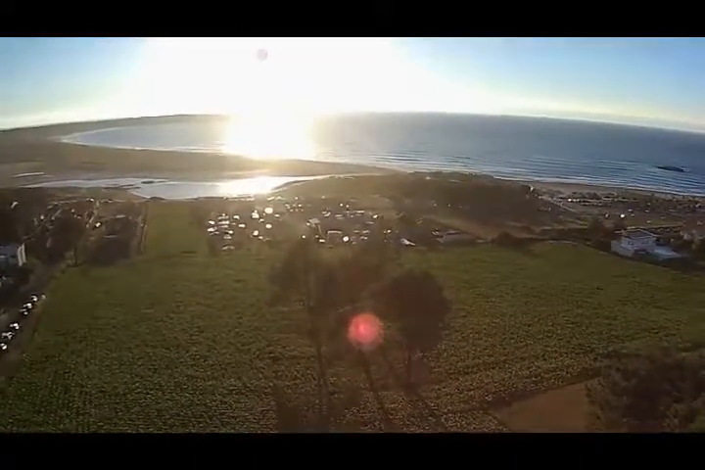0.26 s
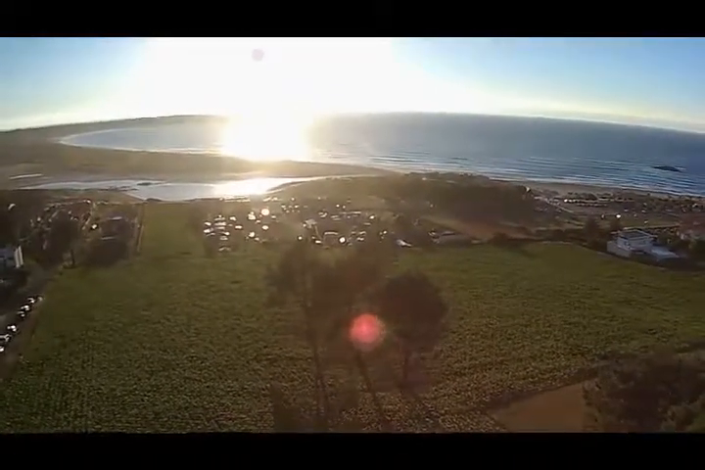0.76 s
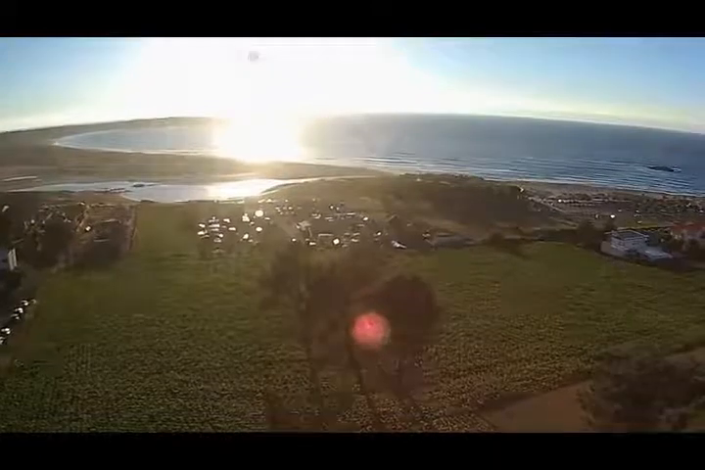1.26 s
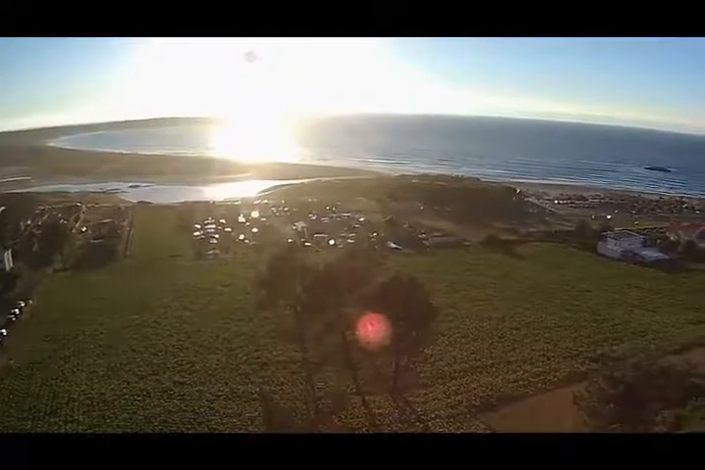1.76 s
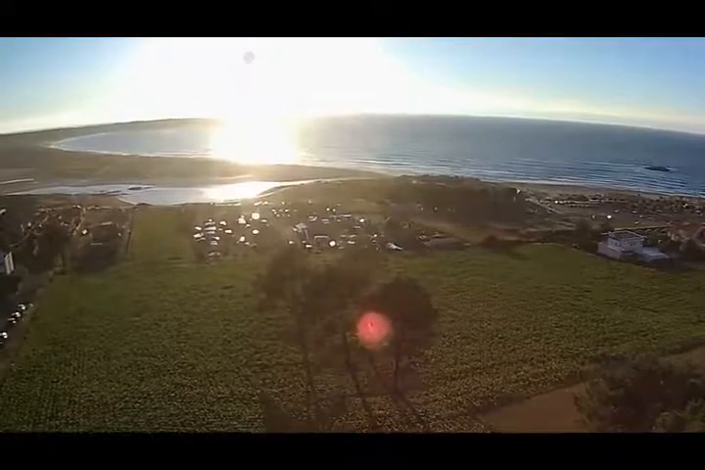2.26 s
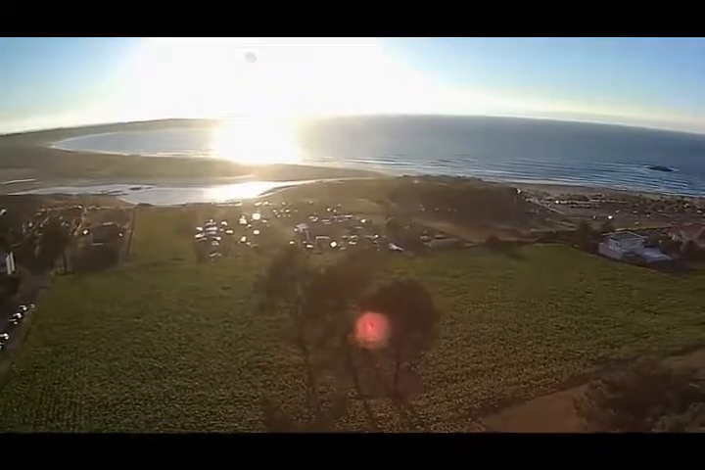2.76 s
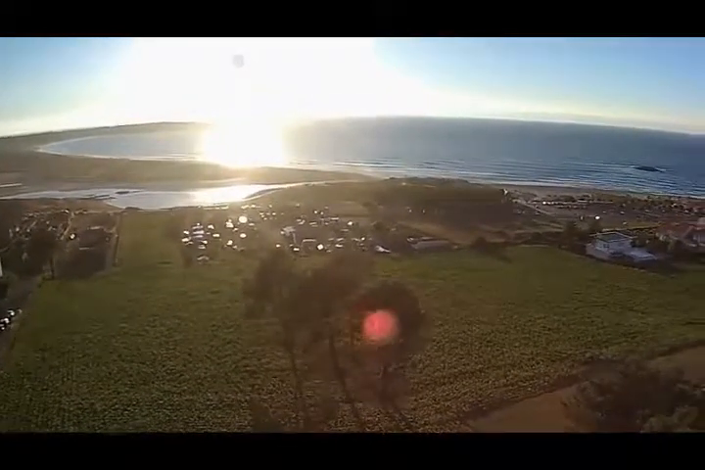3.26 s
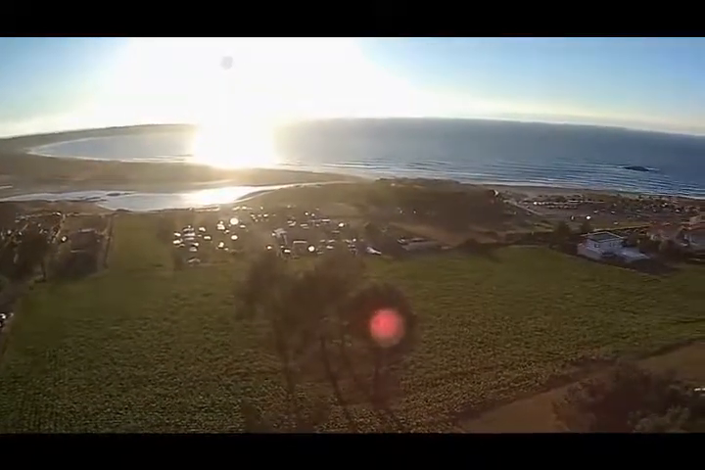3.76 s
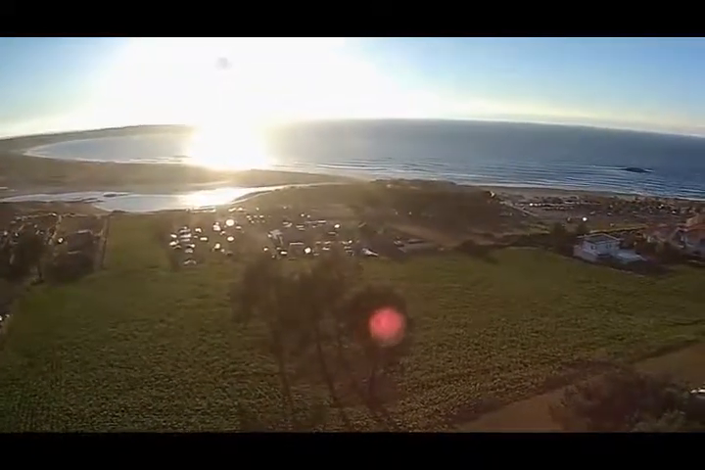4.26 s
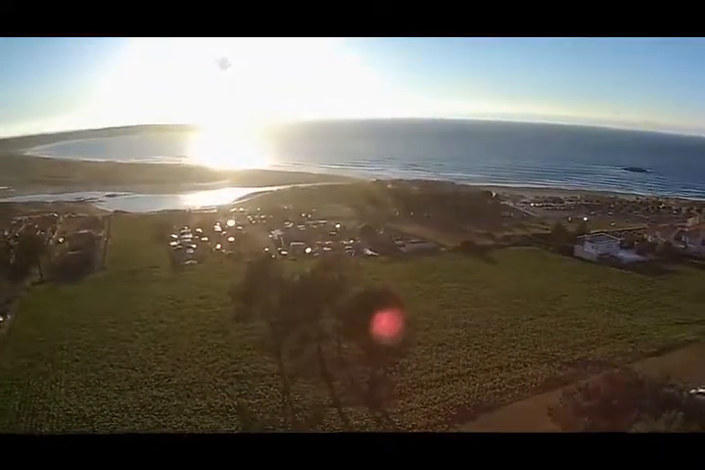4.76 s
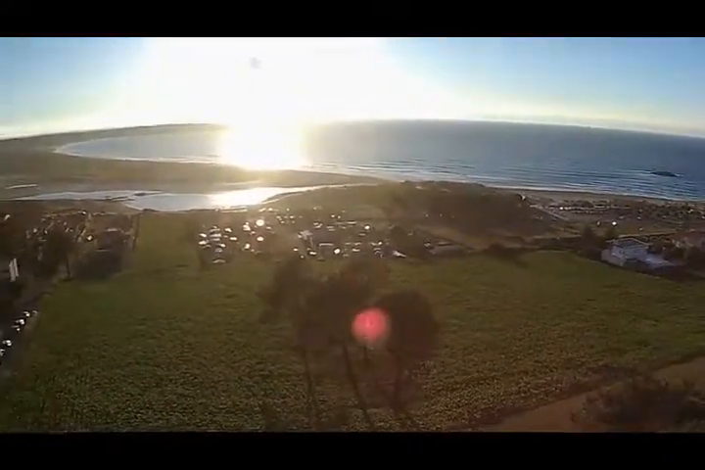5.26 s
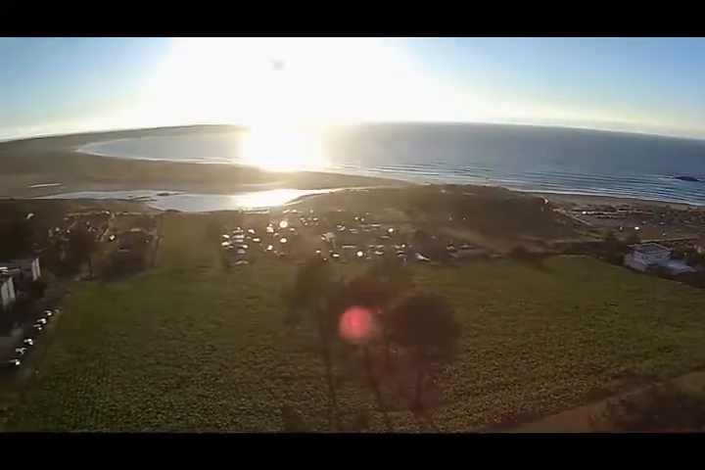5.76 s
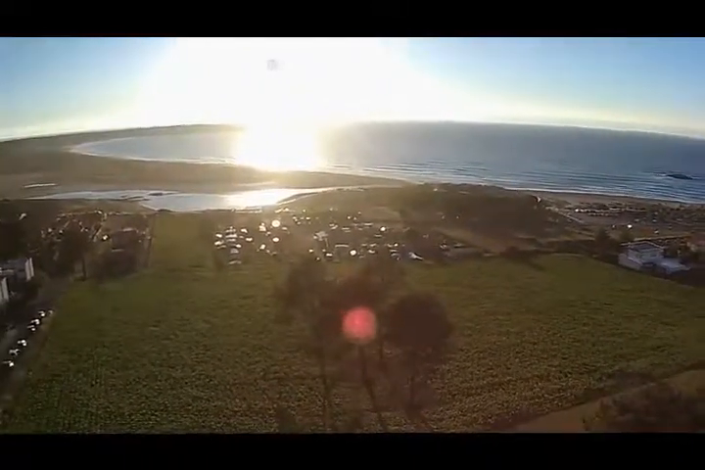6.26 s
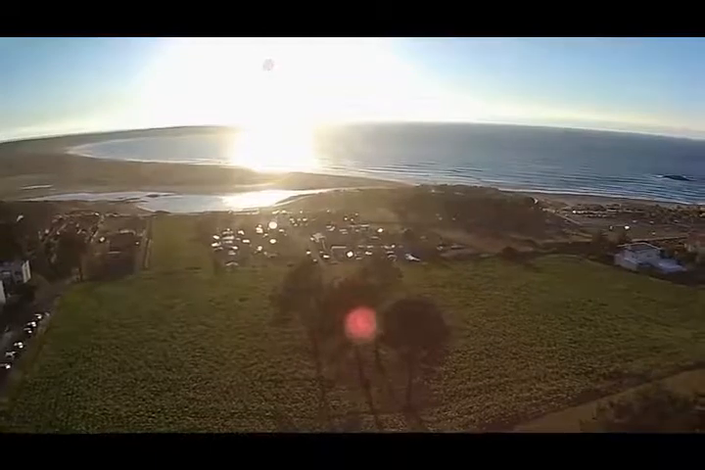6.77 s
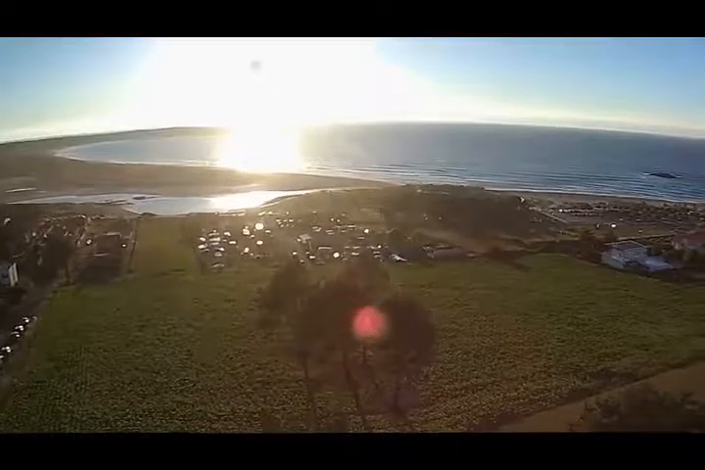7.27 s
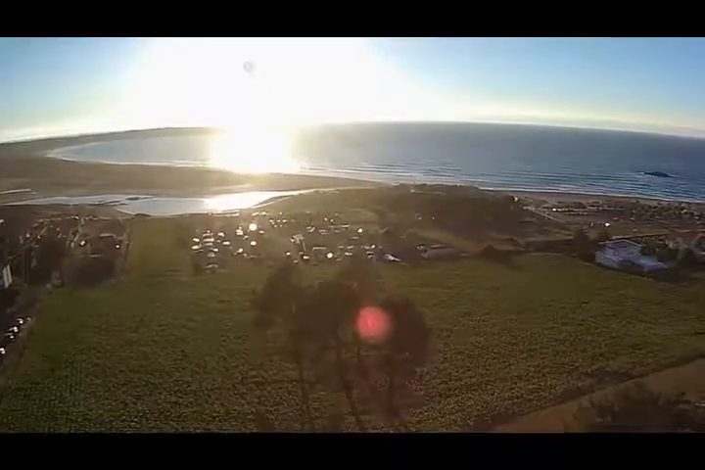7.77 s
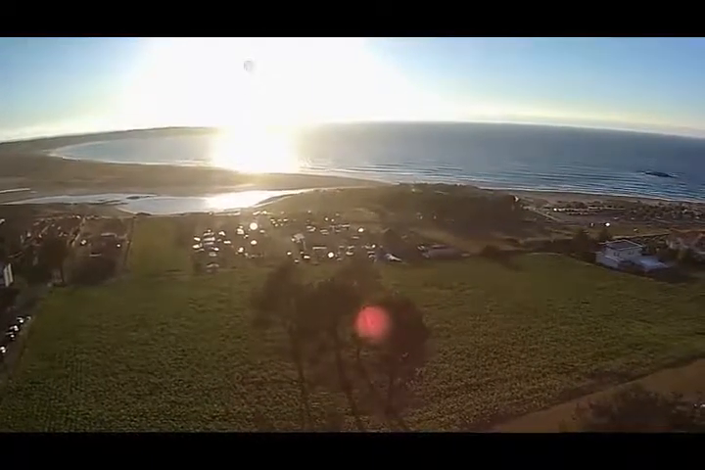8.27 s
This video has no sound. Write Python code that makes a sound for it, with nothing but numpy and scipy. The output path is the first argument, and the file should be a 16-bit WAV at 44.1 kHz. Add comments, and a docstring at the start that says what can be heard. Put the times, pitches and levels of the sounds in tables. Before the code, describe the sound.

A small drone is in flight outdoors, heard from its own microphone at a constant, close distance. From the start a loud rush of air hisses over the buzzing hum of the propellers, whose tones waver and drift against each other. A thin, throbbing whine comes and goes, and short rasping surges of hiss break in at irregular moments, most densely in the first 3 seconds. Faint wind rumble lies underneath. From about 3 to 5 seconds the hum sinks slightly in pitch and weakens, the whine fades, and the hiss grows brighter and rougher, with gusts between 3.5 and 4.8 seconds. Around 5.5 seconds the motors rise a little in pitch, then settle back by 7 seconds as the whine returns. More quick rasps come near 8 seconds, and the hum and rush continue to the end at about 8.5 seconds.

```python
"""Multirotor heard from its own camera

A slow and a fast rotor pair hum at harmonics of their blade-passing rates, which drift through each other.
Turbulent wash rushes over the camera case, modulated by the blades and surging in eddies and gusts; when
the slow pair throttles back, the flow roughens and the hiss brightens. One harmonic rings the frame,
wind rumbles on the microphone port, and the recorder limits the peaks of the hiss."""
import sys
import numpy as np
from scipy import signal
from scipy.fft import rfft, irfft, next_fast_len
from scipy.io import wavfile
from scipy.ndimage import uniform_filter1d, minimum_filter1d

SR = 44100
rng = np.random.default_rng(int(sys.argv[2]) if len(sys.argv) > 2 else 0)


def unload_wav(signal):
    """Save mono or channel-first audio to the path in sys.argv[1] as 16-bit WAV at rate SR, clipped to [-1, 1]."""
    wavfile.write(
        sys.argv[1],
        SR,
        np.round(np.clip(np.atleast_2d(signal).T, -1, 1) * 32767).astype(np.int16),
    )


N = 375732
TIME = np.arange(N) / SR
CRUISE_HZ = 200.3  # blade-passing rate in level flight


def from_db(db):
    """Amplitude ratio of a level in decibels."""
    return 10 ** (np.asarray(db) / 20)


def rms_one(x):
    """Normalisation to unit rms."""
    return x / np.sqrt(np.mean(x ** 2) + 1e-20)


def in_time(curve):
    """Linear interpolation of (t, value) points at every sample."""
    return np.interp(TIME, *np.transpose(curve))


def swell(t, length):
    """Gaussian pulse of height 1 at time t, with the given width at half height."""
    return np.exp(-np.log(16) * np.minimum(((TIME - t) / length) ** 2, 20))


def rise_db(events):
    """Superposition of Gaussian swells in level."""
    return sum(db * swell(t, length) for t, db, length in events)


def drift(hz):
    """Low-pass random process of unit rms, with its corner at hz."""
    step, settle = 40, 2000
    pole = np.exp(-2 * np.pi * hz * step / SR)
    white = rng.standard_normal(N // step + settle + 2)
    slow = signal.lfilter([1], [1, -2 * pole, pole * pole], white)[settle:]
    return np.interp(np.arange(N) / step, np.arange(len(slow)), rms_one(slow))


def air_noise(spectrum):
    """Spectral shaping of white noise, at unit rms."""
    hz, db = np.transpose(spectrum)
    size = next_fast_len(N)
    bins = np.maximum(np.fft.rfftfreq(size, 1 / SR), 1)
    gain = from_db(np.interp(np.log(bins), np.log(hz), db, right=-np.inf))
    return rms_one(irfft(rfft(rng.standard_normal(size)) * gain, size)[:N])


def chopped(phase, depth):
    """Amplitude modulation: one puff of air per cycle of the phase."""
    return rms_one(1 + depth * np.cos(phase))


# spectrum of wind on the microphone port: f/Hz, relative level/dB
PORT_SPECTRUM = [(12, -2.5), (40, 1.5), (90, 2.5), (140, -2.5), (250, -11.5), (500, -39.5)]
# puffs of wind on the port: t/s, rise/dB, duration/s
PORT_PUFFS = [(2.43, 8, .25), (3.2, 4.5, .7), (4.55, 5.5, .5), (8.17, 6, .2)]
def port_rumble():
    """Turbulent pressure on the microphone port gives a low rumble that swells with each puff."""
    return from_db(-46 + rise_db(PORT_PUFFS) + 1.3 * drift(6)) * air_noise(PORT_SPECTRUM)


# gusts that strike the frame: t/s, rise/dB, duration/s
FRAME_GUSTS = [(1.6, 1.5, .7), (3.65, 3, 0.4), (4.25, 5, 0.39), (4.7, 4, 0.41), (6.3, 2.5, .4),
               (8.05, 2.5, .5)]
def gust_rise():
    """Unsteady inflow: each gust raises the buffeting by a few dB."""
    return rise_db(FRAME_GUSTS)


# spectrum of the buffeting: f/Hz, relative level/dB
BUFFET_SPECTRUM = [(70, -13), (150, -4), (300, -2.5), (500, -0.5), (750, 2), (1100, 0.5), (2000, -21)]
def buffeting(gust_db):
    """Turbulent loading of the frame radiates low and middle noise that follows the gusts."""
    return from_db(-29 + gust_db + .74 * drift(14)) * air_noise(BUFFET_SPECTRUM)


# blade-passing rates of the slow and the fast pair: t/s, f/Hz
SLOW_BLADE_RATE = [(0, 201.5), (.45, 201.5), (1.05, 198.5), (1.55, 200), (1.92, 195), (2.08, 201),
                   (2.75, 199.5), (3.2, 191.5), (4.25, 190.5), (4.6, 187.5), (4.9, 196), (5.15, 197.5),
                   (5.55, 209.5), (6.1, 209), (6.45, 206.5), (7.05, 200), (7.85, 199.7), (8.52, 201)]
FAST_BLADE_RATE = [(0, 204), (.5, 215), (1.55, 215), (1.9, 225), (2.4, 216), (3.75, 216), (4, 195),
                   (4.8, 231), (5.15, 212), (5.5, 215), (6.3, 208.5), (6.6, 209), (7, 215), (7.3, 211),
                   (8, 224), (8.52, 217)]
def blade_phase(rate, hunting):
    """Phase is the integral of frequency; the flight controller keeps nudging the speed."""
    return 2 * np.pi * (np.cumsum(rate * (1 + hunting * drift(6.13))) / SR + rng.random())


def shaft_vibration(phase):
    """Once-per-turn vibration, an octave below the two-bladed rotor's tone; it grows near the end."""
    shaking = np.clip((TIME - 7.85) / .3, 0, 1)
    return from_db(-50.5 + 8.5 * shaking) * rms_one(np.sin(phase / 2))


def blade_harmonics(phase, harmonics, flutter_db, smear):
    """Uneven inflow modulates each harmonic in amplitude and phase, the phase most in the high ones."""
    out = np.zeros(N)
    for order, db in harmonics:
        strength = from_db(flutter_db * drift(6.7) + 1.5 * drift(2))  # quick flutter, slow fading
        jitter = smear * order * drift(25)
        out += from_db(db) * rms_one(strength * np.sin(order * phase + jitter))
    return out


# tones of the slow pair: harmonic number, relative level/dB
SLOW_HARMONICS = [(1, -45), (2, -41.5), (3, -37), (4, -33.5), (5, -31), (6, -31.5), (8, -30.5), (10, -29),
                  (12, -37.5)]
# their common strength: t/s, relative level/dB
SLOW_HUM_LEVEL = [(0, 1.5), (.6, -1.5), (1.4, 0), (2.25, .5), (3, -7), (3.7, -2.5), (5, 0), (5.8, 1),
                  (6.3, 0), (7, 0.5), (8.52, 0)]
def slow_hum(phase, hum_db, gust_db):
    """Periodic blade loading makes the slow pair hum; gusts broaden its spectral lines."""
    smear = .08 * from_db(gust_db) ** 3
    return from_db(hum_db) * blade_harmonics(phase, SLOW_HARMONICS, flutter_db=2.5, smear=smear)


# tones of the fast pair: harmonic number, relative level/dB
FAST_HARMONICS = [(1, -0.5), (2, -5.5), (3, -5), (4, -10), (5, -5)]
def fast_hum(phase, slow_rate, gust_db):
    """Periodic blade loading of the fast pair, louder as the slow pair throttles up above cruise."""
    level = from_db(-40 + .55 * np.maximum(slow_rate - CRUISE_HZ, 0))
    return level * blade_harmonics(phase, FAST_HARMONICS, flutter_db=1.5, smear=.14 * from_db(gust_db))


def frame_whine(rate, phase, eddies, hum_db, order=7, resonance_hz=1411, width_hz=63, rocking_hz=8.4):
    """Forced resonance: a blade harmonic rings the frame, throbbing as the craft rocks."""
    response = 1 / np.hypot(1, 2 * (order * rate - resonance_hz) / width_hz)
    rocking = 2 * np.pi * np.cumsum(rocking_hz * (1 + .256 * drift(3.13))) / SR
    throb = rms_one(from_db(4.5 * np.sin(rocking)))
    calm = 1 / (1 + (eddies / from_db(-14)) ** 2)  # an eddy breaks up the steady drive
    level = from_db(-19.5 + .5 * hum_db) * response * throb * calm
    return level * rms_one(np.sin(order * phase + .68 * drift(15)))


# strong eddies: t/s, relative peak level/dB, duration/s
STRONG_EDDIES = [(0.315, -19, .06), (.7, -16.5, .038), (0.791, -15.5, .019), (1.103, -17.5, 0.028),
                 (1.22, -16.5, .024), (1.36, -20.5, .07), (1.717, -18.5, 0.023), (1.891, -17, .061),
                 (2.104, -19.5, .1), (2.361, -17, 0.021), (2.465, -17, .025), (2.57, -15.5, 0.027),
                 (2.644, -16, .025), (2.862, -12.5, .018), (2.97, -14, .042), (3.4, -21, 0.31),
                 (3.634, -18.5, 0.052), (4.377, -13.5, .018), (4.822, -13.5, .021), (4.957, -18.5, 0.054),
                 (5.795, -12.5, .015), (6.448, -17, .038), (6.99, -20, .05), (7.192, -15, .029),
                 (7.704, -19.5, .07), (7.818, -18.5, .039), (7.954, -17, .029), (8.06, -14, 0.022),
                 (8.19, -17.5, .029), (8.277, -19.5, .035), (8.419, -18, 0.04)]
def eddy_envelope(weak_per_s=7, weak_db=-21, spread_db=1.5, weak_s=.033, clearance_s=.1):
    """Incoherent addition: strong eddies and a loose train of weak ones between them sum in power."""
    gaps, sizes = rng.random((2, 90))
    times = np.cumsum(.5 + gaps) / weak_per_s
    strong_times = np.array(STRONG_EDDIES)[:, 0]
    weak = [(t, weak_db + spread_db * (2 * size - 1), weak_s) for t, size in zip(times, sizes)
            if t < TIME[-1] and np.abs(strong_times - t).min() > clearance_s]
    return np.sqrt(sum(from_db(db) ** 2 * swell(t, length) for t, db, length in list(STRONG_EDDIES) + weak))


def lulls(depth_db=-.95, delay_s=.069, lull_s=.06):
    """Delayed modulation: the rush sags briefly behind each strong eddy."""
    dips = sum(swell(t + length / 2 + delay_s, lull_s) for t, _, length in STRONG_EDDIES)
    return from_db(depth_db * dips)


# spectrum of blade-tip stall: f/Hz, relative level/dB
STALL_SPECTRUM = [(1200, -18), (1700, -7.5), (2200, -2), (2400, 5), (2560, 0), (2760, 5), (3050, -10.5),
                  (3600, -14.5), (4000, -23), (4700, -29), (5500, -38), (6200, -59.5)]
def stall_rasp(slow_phase, fast_phase, eddies):
    """Periodic stall: in an eddy a blade tip stalls once per turn, so each surge of hiss rattles."""
    slow_stalls = chopped(slow_phase / 2 + .7 * drift(23), depth=.71)
    fast_stalls = chopped(fast_phase / 2 + .77 * drift(20), depth=.69)
    return from_db(3) * eddies * slow_stalls * fast_stalls * air_noise(STALL_SPECTRUM)


# spectrum of flow over the case's edges: f/Hz, relative level/dB
EDGE_SPECTRUM = [(1200, -21.5), (1700, -2.5), (2200, 4), (2400, 5.5), (2560, 2), (2760, 6), (3050, -7),
                 (3600, -11.5), (4000, -19.5), (4700, -30), (5500, -34.5), (6200, -57.5)]
def edge_hiss(phase, roughness):
    """Flow separation at the edges of the case gives a sharp hiss that rises in rough flow."""
    level = from_db(-26 + 8.5 * roughness + 3.3 * drift(45))
    return level * air_noise(EDGE_SPECTRUM) * chopped(phase, depth=.23)


# spectrum of the propeller wash: f/Hz, relative level/dB
WASH_SPECTRUM = [(500, -31), (850, -16.5), (1050, -7), (1220, -1), (1400, 2.5), (1600, -0.5), (2050, -2),
                 (2400, -6), (2800, -7.5), (3300, -13), (4000, -23.5), (4700, -27), (5500, -37.5),
                 (6200, -65.5)]
def propeller_wash(phase, roughness, gust_db):
    """Broadband turbulence streams over the case, modulated at the blade-passing rate."""
    level = from_db(-13 + .15 * roughness + .13 * gust_db + .75 * drift(27))
    return level * air_noise(WASH_SPECTRUM) * chopped(phase, depth=.15)


def scene():
    """Superposition at constant distance, since the camera rides on the frame."""
    slow_rate, fast_rate = in_time(SLOW_BLADE_RATE), in_time(FAST_BLADE_RATE)
    slow_phase = blade_phase(slow_rate, hunting=.00251)
    fast_phase = blade_phase(fast_rate, hunting=.00199)
    roughness = np.clip((CRUISE_HZ - slow_rate) / 9, 0, 1)  # fully rough 9 Hz below cruise
    eddies, gust_db, hum_db = eddy_envelope(), gust_rise(), in_time(SLOW_HUM_LEVEL)
    rush = port_rumble() + buffeting(gust_db)
    rush += propeller_wash(slow_phase, roughness, gust_db) + edge_hiss(slow_phase, roughness)
    rush += frame_whine(slow_rate, slow_phase, eddies, hum_db)
    rotors = slow_hum(slow_phase, hum_db, gust_db) + fast_hum(fast_phase, slow_rate, gust_db)
    rotors += shaft_vibration(slow_phase)
    return (rotors + lulls() * rush + stall_rasp(slow_phase, fast_phase, eddies))[None]


def limiter(x, ceiling_db, hold_s):
    """Peak limiting: the gain ducks quickly around peaks that pass the ceiling."""
    size = int(hold_s * SR)
    gain = np.minimum(1, from_db(ceiling_db) / (np.abs(x) + 1e-9))
    return x * uniform_filter1d(minimum_filter1d(gain, size), size)


def crackle(x):
    """Poisson process of treble ticks, more frequent the louder the rush."""
    power = rms_one(uniform_filter1d(x ** 2, size=400))
    ticks = (rng.random(N) < 25 * power ** 2 / SR) * rng.uniform(-1, 1, N)
    return signal.sosfilt(signal.butter(4, 9800, "high", fs=SR, output="sos"), ticks)


# spectrum of the thin top hiss: f/Hz, relative level/dB
SIZZLE_SPECTRUM = [(5000, -18), (6200, -23), (6800, -9.5), (7400, -15.5), (8000, -29), (8700, -12.5),
                   (10300, -6.5), (11100, 0.5), (11800, -3.5), (12700, -12), (15500, -14)]
def sizzle(x):
    """Modulation noise: a thin hiss that weakly follows the signal's envelope."""
    loudness = rms_one(np.abs(uniform_filter1d(x ** 2, size=60)) ** .15)
    return loudness * air_noise(SIZZLE_SPECTRUM)


def record(dry):
    """Peak and band limiting: the recorder squeezes and dulls the sound, adding sizzle and crackle."""
    limited = limiter(from_db(.08) * dry[0], ceiling_db=-2.5, hold_s=.00078)
    dull = signal.sosfilt(signal.butter(8, 6100, fs=SR, output="sos"), limited)
    treble = from_db(-48.5) * sizzle(dull) + from_db(-21.5) * crackle(dull)
    band_limit = signal.ellip(10, .1, 90, 15500, fs=SR, output="sos")
    return signal.sosfilt(band_limit, dull + treble)[None]


dry = scene()
out = record(dry)
unload_wav(out)
```